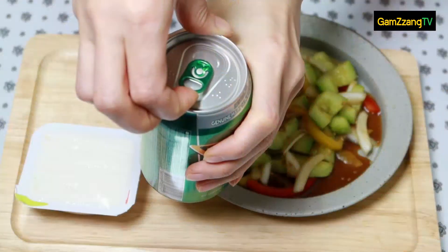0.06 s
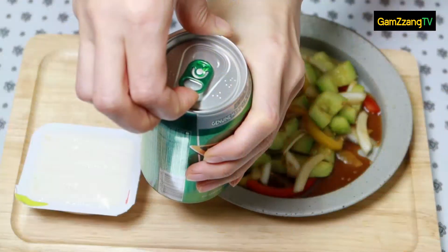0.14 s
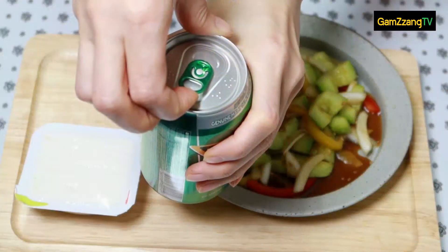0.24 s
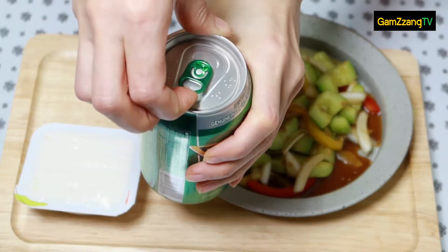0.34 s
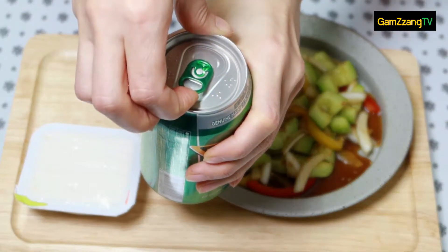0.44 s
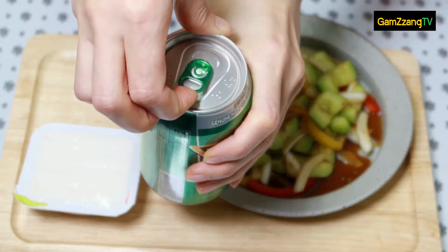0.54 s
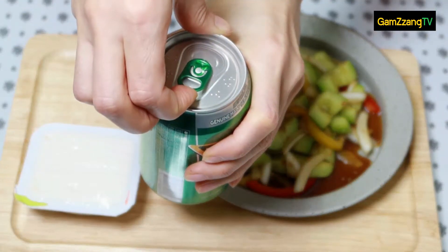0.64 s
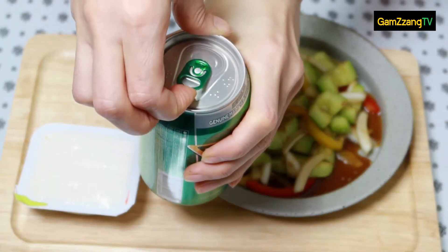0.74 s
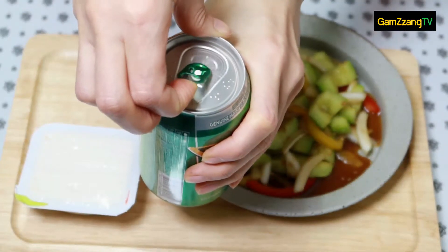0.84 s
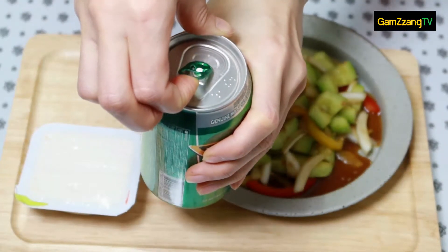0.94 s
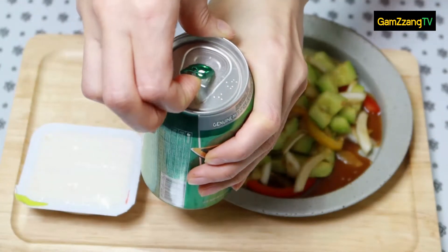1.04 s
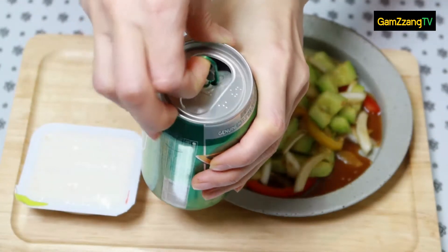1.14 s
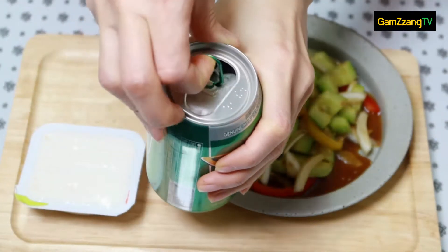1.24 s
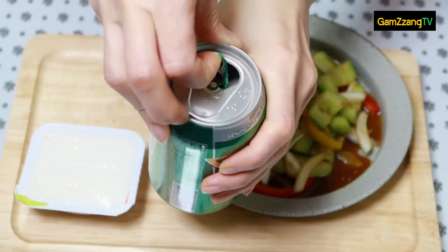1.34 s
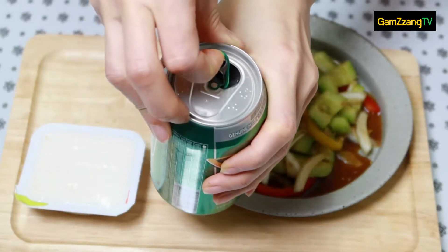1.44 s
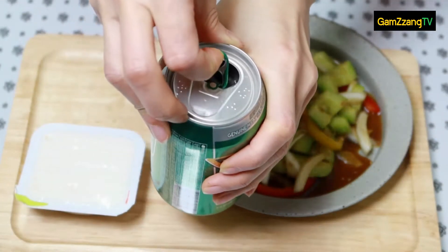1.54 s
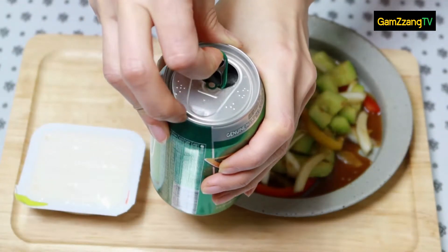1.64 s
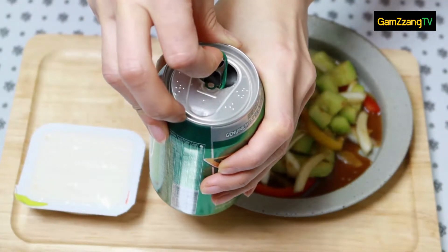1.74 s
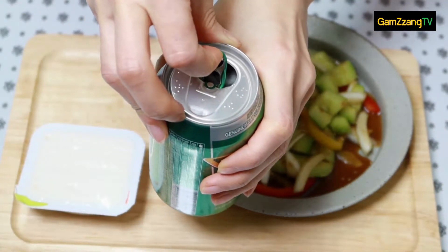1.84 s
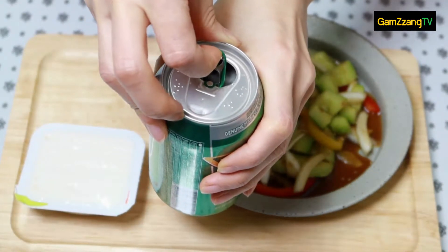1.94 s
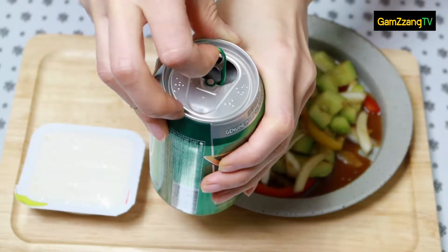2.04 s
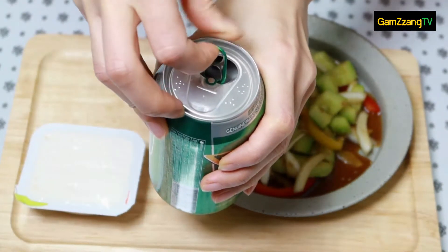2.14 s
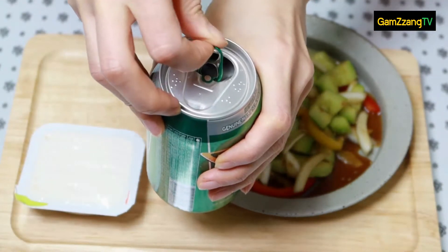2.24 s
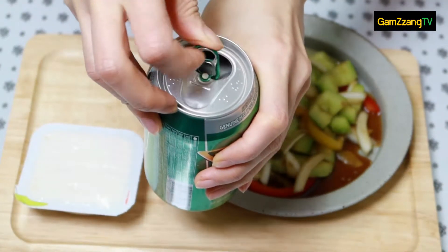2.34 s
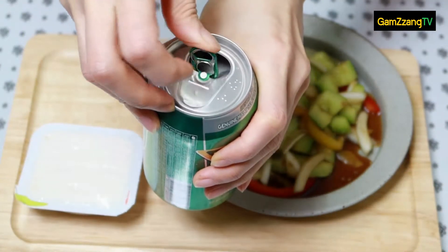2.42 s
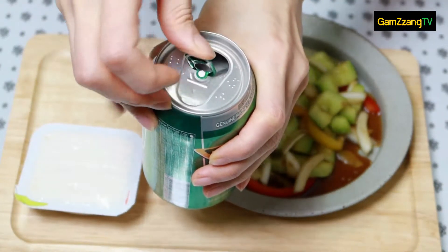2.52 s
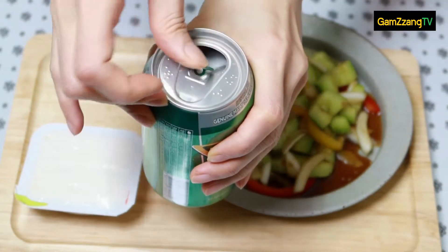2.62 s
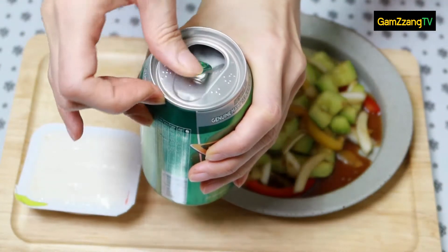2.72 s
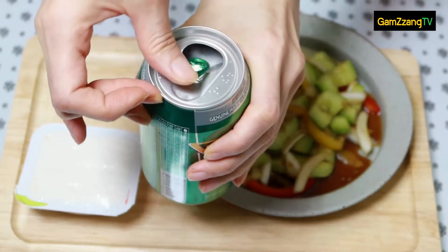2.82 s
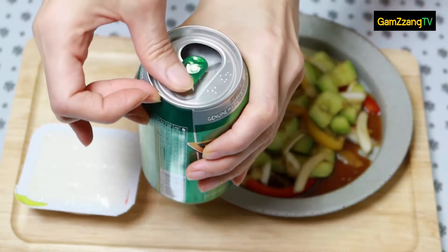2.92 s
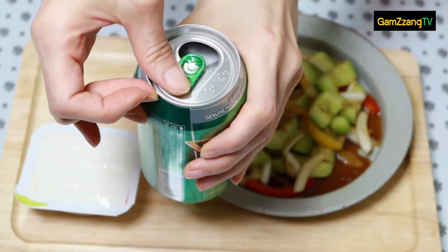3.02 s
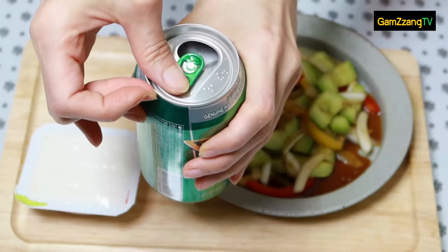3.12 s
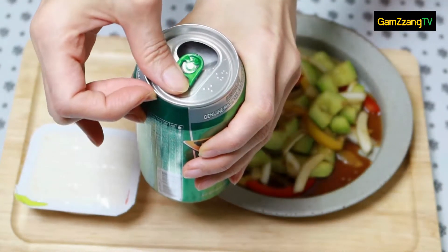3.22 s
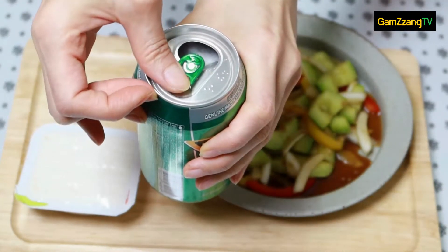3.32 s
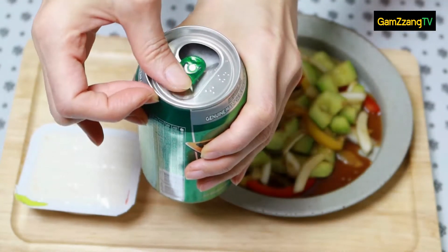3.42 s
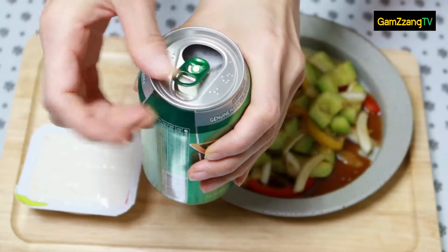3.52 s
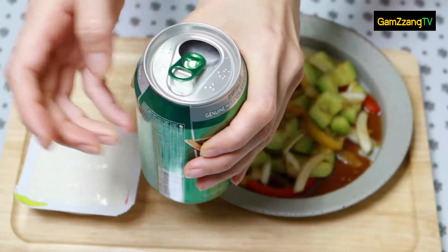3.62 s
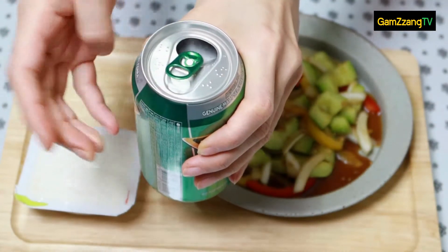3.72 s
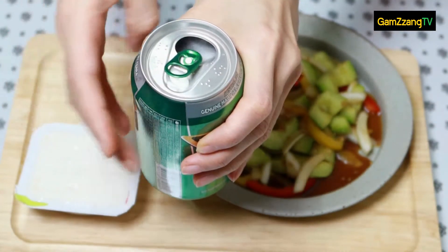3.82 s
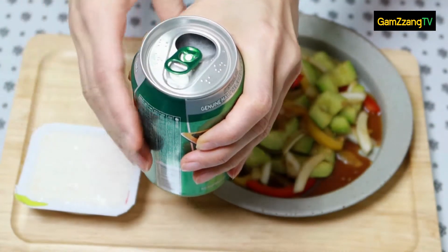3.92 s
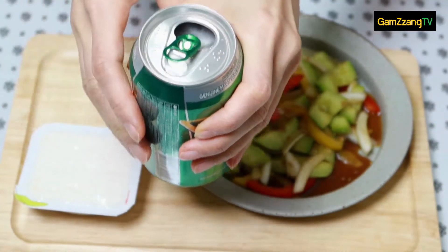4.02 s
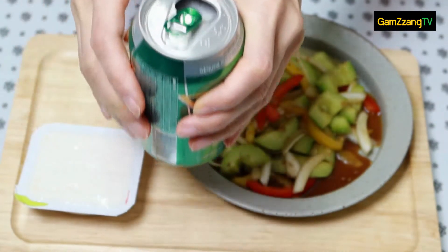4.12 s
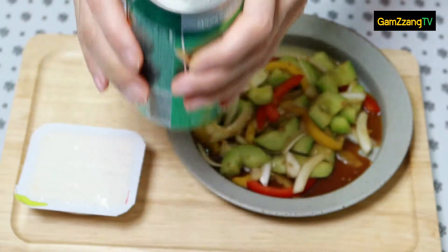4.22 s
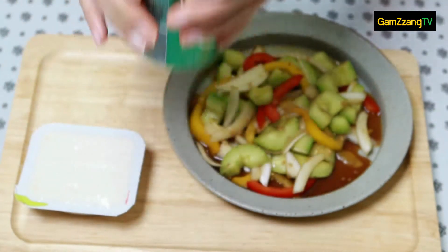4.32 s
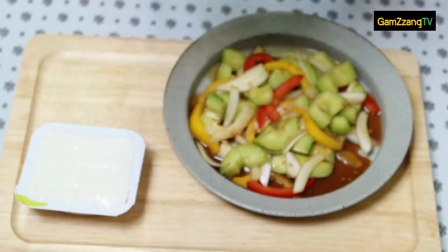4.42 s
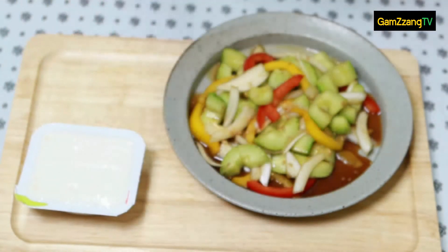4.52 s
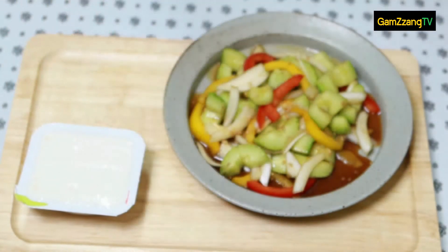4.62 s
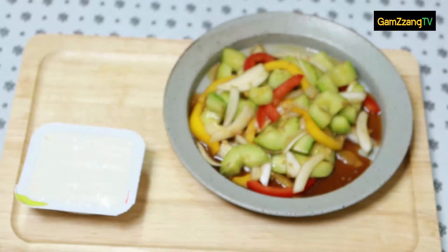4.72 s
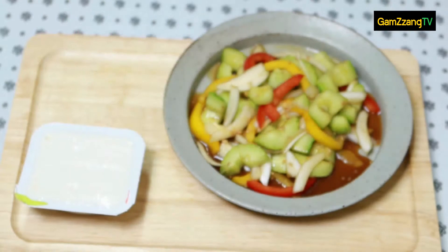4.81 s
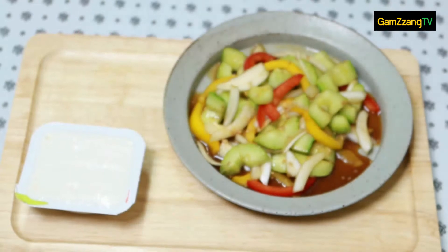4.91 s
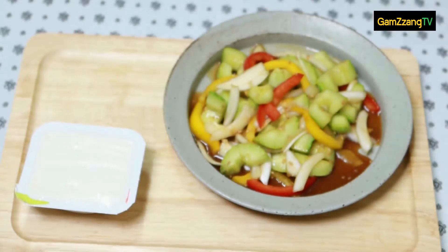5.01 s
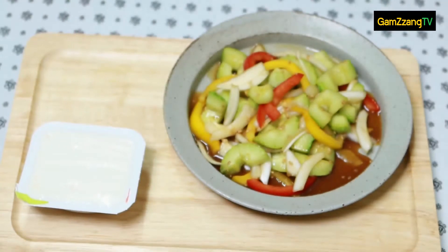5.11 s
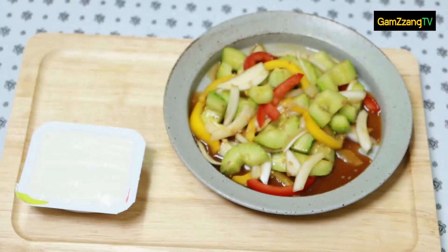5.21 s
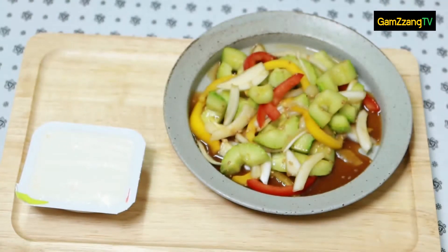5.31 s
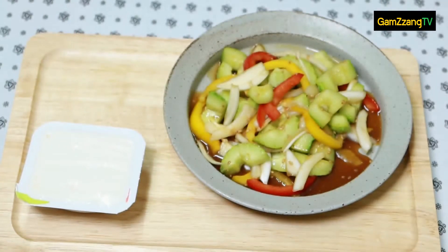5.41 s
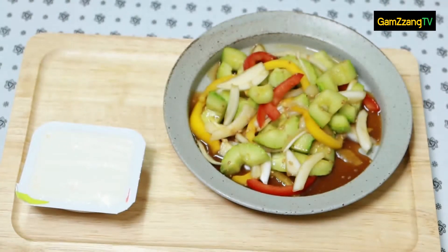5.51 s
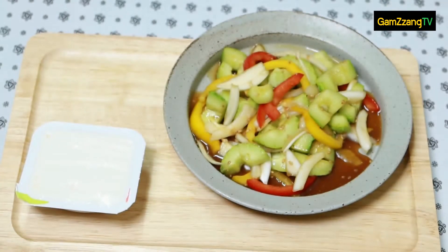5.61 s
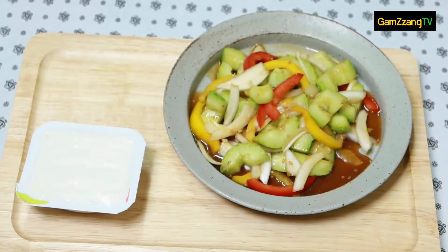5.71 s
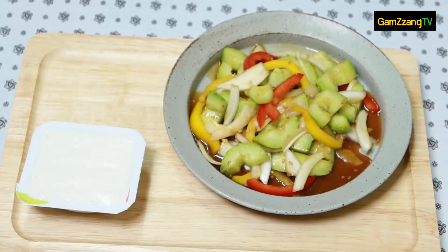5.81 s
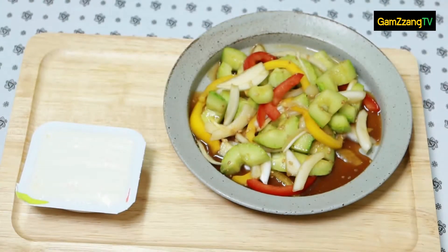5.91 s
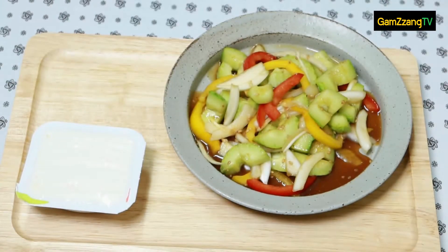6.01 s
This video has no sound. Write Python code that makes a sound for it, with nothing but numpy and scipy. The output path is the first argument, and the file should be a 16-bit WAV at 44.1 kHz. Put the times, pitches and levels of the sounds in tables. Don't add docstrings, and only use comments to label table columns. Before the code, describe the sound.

After a second of low room hum and faint hiss, a drink can vents with a crisp snap and a very short fizzing spurt. The lid then rips open with a dense metallic crackle and a dull pop. Sparse small ticks come from the tab and fingers. Later, softer taps and dry rustling are heard further off. The pickup is close, with a short room echo.

```python
import sys
import numpy as np
from scipy import signal
from scipy.fft import rfft, irfft
from scipy.io import wavfile
from scipy.ndimage import uniform_filter1d

SR = 44100
rng = np.random.default_rng(int(sys.argv[2]) if len(sys.argv) > 2 else 0)


def transcribe(signal):
    frames = np.atleast_2d(signal).T
    limited = np.clip(frames, -1, 1)
    pcm = np.round(limited * 32767).astype(np.int16)
    wavfile.write(sys.argv[1], SR, pcm)


def makeup_ratio(level_db):
    decades = np.asarray(level_db, float) / 20
    return 10 ** decades


N = 267090


def evened(x):
    return x / np.sqrt(np.mean(x ** 2) + 1e-20)


def read(points, hz):
    f, value = np.transpose(points)
    return np.interp(np.log(hz + 1), np.log(f + 1), value)


def coloured(x, points):
    gain = makeup_ratio(read(points, np.fft.rfftfreq(len(x), 1 / SR)))
    return irfft(rfft(x) * gain, len(x))


def envelope(rows, sag_db_per_s=0):
    fade_in_db, fade_out_db = -29.5, -43.5
    t, power = np.arange(N) / SR, np.zeros(N)
    for s, rise, hold, fall, db in rows:
        swell_db = fade_in_db * np.clip(1 - (t - s) / rise, 0, 1) ** 2
        held_db = db + sag_db_per_s * hold
        corners = s + np.cumsum([rise, hold, fall])
        shape_db = np.interp(t, corners, [db, held_db, held_db + fade_out_db], right=-200)
        power += (t > s) * makeup_ratio(swell_db + shape_db) ** 2
    return np.sqrt(power)


def add(mix, s, sound):
    part = mix[round(s * SR):][:len(sound)]
    part += sound[:len(part)]


def ring(t, hz, db, t60):
    return makeup_ratio(db - 60 * t / t60) * np.sin(2 * np.pi * hz * t)


# frequency in Hz, density in dB per Hz.
AIR_COLOUR = [(12, -27), (20, -2.5), (53, -8), (86, 0), (117, -9), (242, -9.5), (271, -17), (330, -10.5),
              (449, -17), (578, -16.5), (2280, -28), (4350, -28.5), (12300, -32), (14500, -26.5),
              (16200, -34)]
# frequency in Hz, width in Hz, level in dB.
MOTOR_LINES = [(81, 13, -59.5), (253.6, 26, -63.5), (329, 49, -67), (1199, 13, -72.5)]


def air(swell_db=3.0):
    swell = evened(uniform_filter1d(rng.standard_normal(N), size=5000, mode="wrap"))
    out = makeup_ratio(-51) * evened(coloured(rng.standard_normal(N), AIR_COLOUR))
    low = signal.lfilter(*signal.butter(2, 600 / SR), out)
    out += low * (makeup_ratio(swell_db * swell) - 1)
    hz = np.fft.rfftfreq(N, 1 / SR)
    for f, width, db in MOTOR_LINES:
        resonance = 1 + (2 * (hz - f) / width) ** 2
        out += makeup_ratio(db) * evened(irfft(rfft(rng.standard_normal(N)) / resonance, N))
    return out


# frequency in Hz, density in dB per Hz.
SIDE_AIR_COLOUR = [(24, -71.5), (40, -44), (220, -45), (288, -12), (395, -7.5), (1150, -8), (3900, -3.5),
                   (12200, -7), (13500, -20)]


def side_air():
    return makeup_ratio(-65.5) * evened(coloured(rng.standard_normal(N), SIDE_AIR_COLOUR))


# frequency in Hz, level in dB, t60 in seconds.
LID_MODES = [(1510, -6.5, 0.0036), (2310, -8.5, 0.0068), (3200, -7, 0.0053), (4270, 0, 0.0022),
             (5400, -8, 0.00079), (5960, 1, 0.00068), (7075, 8, 0.0015), (9020, -1.5, 0.0019),
             (9900, 4.5, 0.00095), (11700, -4, 0.0012), (13646, -4, 0.0005)]


def snap(row, luck, crack_s=0.00027, rattle_s=0.0066, rattle_db=-12.5, spread_db=3.5):
    s, blow_db, tilt_db, hz, db, t60 = row
    t = np.arange(6000) / SR
    brief = t[:900]
    crack = luck[:900] * (np.exp(-brief / crack_s) + makeup_ratio(rattle_db) * np.exp(-brief / rattle_s))
    crack[0] += 3.0

    body = np.zeros(900)
    for k, ((f, mode_db, mode_t60), a, b) in enumerate(zip(LID_MODES, luck[900:], luck[930:])):
        octaves = np.log2(f / 4000)
        octaves += 0.58 * (tilt_db < 0) * max(np.log2(f / 7000), 0)
        struck_db = mode_db + spread_db * b + tilt_db * octaves
        body += (-1) ** k * ring(brief, f * (1 + a / 40), struck_db, mode_t60)
    body = signal.lfilter(*signal.butter(3, 1900 / SR, "high"), body)
    broad = np.convolve(body, crack)
    broad /= abs(broad).max()

    loudest = ring(t, hz, db, t60) + ring(t, hz * 1.03, db - 8, t60)
    near = loudest * np.minimum(t / 0.0017, 1)
    far = near * makeup_ratio(-6.5)
    add(near, 0, broad)
    push_db = -33.5 + 0.6 * blow_db
    add(near, 0, makeup_ratio(push_db) * np.hanning(44))
    add(far, 0, body * np.linalg.norm(broad) / np.linalg.norm(body))
    return s, makeup_ratio(blow_db) * near, makeup_ratio(blow_db) * far


# time in seconds, blow in dB, brightness in dB per octave,
# loudest ring in Hz, its level in dB.
LID_SNAPS = [(0.9779, 4, 4.5, 3330, -2), (1.0457, 2.5, -1, 4385, 9), (1.0462, -8, -8, 1956, 6),
             (1.269, -31, -5.5, 2200, -2.5), (1.2974, -10.5, 4.5, 4470, -4), (1.305, 8.5, 2.5, 4490, 5.5),
             (1.3122, -12.5, -2.5, 2100, 0), (1.3199, -20, 5, 4500, 13.5), (1.3252, -1, -1, 13900, 10),
             (1.3352, 2.5, 1, 12900, -6.5), (1.3430, 10.5, 0.5, 3120, -11.5), (1.3434, -4, 0, 1000, -3),
             (1.4285, -4, 17, 1450, -12), (1.4640, -20, -3, 12200, 6), (1.495, -23, -2, 1930, -28),
             (1.5054, -4, 6, 3200, -11.5), (1.5362, -7, 3.5, 1330, -12.5), (1.541, -5.5, 26, 3380, -12.5),
             (1.555, -24, 9, 3400, -19.5), (1.5725, -4, 4.5, 8700, -3), (1.5765, -5.5, 3.5, 1480, -14)]
# time in seconds, blow in dB, brightness in dB per octave,
# loudest ring in Hz, its level in dB.
TAB_TICKS = [(2.2206, -21.5, -10.5, 3050, -7), (2.2364, -35.5, -12, 2840, -4.5),
             (2.2518, -37, -19, 1500, -8.5), (2.2830, -42, -11, 9060, -12.5), (2.2886, -24.5, 9, 2230, -10),
             (2.515, -40, -5, 2676, -9), (3.2145, -20.5, -2, 1900, -14.5), (3.2147, -26, 0, 7380, 6),
             (3.7043, -19, -5.5, 1025, -8), (3.7056, -25, -2.5, 3010, -8), (3.975, -41.5, -4.5, 393, -6),
             (4.789, -46, -20.5, 1557, -5), (4.829, -40.5, -20, 3330, -11), (4.855, -32.5, 0, 1473, -6.5),
             (4.907, -41.5, -23, 2250, -4), (4.97, -52, 7.5, 1494, 0), (5.056, -47, -4.5, 1570, -2.5),
             (5.92, -27.5, 0.5, 5600, -8.5), (5.926, -34, -1, 4040, -2)]
# time in seconds, blow in dB, ring in Hz.
FINGER_SQUEAKS = [
    (5.390, -48, 11700),
    (5.428, -52, 7760),
    (5.440, -49, 11800),
]


def blows():
    snaps, ticks = [], []
    for row in LID_SNAPS:
        hz, db = row[3:]
        t60 = 0.011 * (3000 / hz) ** 0.2
        snaps.append((*row, t60 * makeup_ratio(-0.18 * np.clip(db, -20, 5))))
    for row in TAB_TICKS:
        t60 = 0.012 * (3000 / row[3]) ** 2.2 + 0.008
        ticks.append((*row, min(t60, 0.068)))
    squeaks = [(s, db, 1.3, hz, 3.5, 0.043) for s, db, hz in FINGER_SQUEAKS]
    return snaps + ticks + squeaks


# time in seconds, level in dB.
AIR_PUSHES = [
    (1.0466, -20),
    (1.3440, -9),
]


def lid():
    near, far = np.zeros((2, N))
    for row, luck in zip(blows(), rng.standard_normal((60, 960))):
        s, to_near, to_far = snap(row, luck)
        add(near, s, to_near)
        add(far, s, to_far)
    for s, db in AIR_PUSHES:
        add(near, s, makeup_ratio(db) * np.hanning(60))
    return near, far


# frequency in Hz, density in dB per Hz.
GAS_COLOUR = [(290, -65), (500, -43.5), (1050, -43.5), (2430, -22), (2730, -30), (4340, -17.5),
              (4730, -18.5), (6800, -14), (11300, -7), (16000, -13.5)]
# start, rise, hold and fall in seconds, level in dB.
GAS_BURSTS = [
    (.978, .001, 0.0012, 0.01, -12),
    (.978, .03, 0.033, .022, -3),
    (2.255, 0.042, .002, 0.042, -43),
]


def jet(flutter_db=0.5):
    flutter = evened(uniform_filter1d(rng.standard_normal(N), size=60))
    gas = evened(coloured(rng.standard_normal(N), GAS_COLOUR))
    return gas * envelope(GAS_BURSTS, sag_db_per_s=-100) * makeup_ratio(flutter_db * flutter)


# frequency in Hz, t60 in seconds.
KITCHEN_T60 = [(500, 0.039), (1500, 0.41), (4000, 0.25), (8000, 0.23), (15000, 0.16)]


def kitchen(x, first_s=0.003):
    taps = np.zeros(SR // 2)
    at = np.arange(round(first_s * SR), len(taps) - 20, 20)
    taps[at + rng.integers(0, 20, len(at))] = rng.choice([-1., 1.], len(at))
    hz, t, z = signal.stft(taps, SR, nperseg=128)
    decay = makeup_ratio(-60 * t / read(KITCHEN_T60, hz)[:, None])
    tail = signal.istft(z * decay, SR, nperseg=128)[1]
    return signal.fftconvolve(x, tail / np.linalg.norm(tail))[:N]


# frequency in Hz, gain in dB.
SEALED_COLOUR = [(700, -8), (1400, -1.5), (2050, 3), (3100, -12), (3700, 5), (4500, 3), (5600, -0.5),
                 (12000, -4)]
# frequency in Hz, gain in # dB
SIDE_COLOUR = [(60, -9), (300, -15), (900, -15), (1800, -14.5), (3300, -16), (4500, -37.5), (16000, -30)]


def reflections(far):
    sealed = np.arange(N) < 1.26 * SR
    sent = coloured(far * sealed, SEALED_COLOUR) + far * ~sealed
    return makeup_ratio(-9.5) * kitchen(sent), coloured(kitchen(sent), SIDE_COLOUR)


# frequency in Hz, level in dB, t60 in seconds.
WALL_MODES = [(1000, -19, .02), (1460, -15, .03), (2200, -18.5, 0.027), (3140, -17.5, .03)]
# start, rise, hold and fall in seconds, level in dB.
LID_RIPS = [
    (1.294, .008, .045, .2, -27.5),
    (1.34, .02, 0.11, .06, -33),
    (1.49, .015, 0.046, 0.039, -42.5),
]


def tear(per_s=5400.0, size_db=0.5, tilt_db=4.24):
    happens = rng.random(N) < per_s / SR
    slips = happens * rng.standard_normal(N) * makeup_ratio(size_db * rng.exponential(1, N))
    t = np.arange(2000) / SR
    response = np.zeros(2000)
    for f, db, t60 in LID_MODES + WALL_MODES:
        response += ring(t, f, db + tilt_db * np.log2(f / 4000), 1.8 * t60)
    torn = evened(signal.oaconvolve(slips, response)[:N])
    return torn * envelope(LID_RIPS, sag_db_per_s=-30.5)


# frequency in Hz, density in dB per Hz.
CLOTH_COLOUR = [(800, -8.5), (2500, -10.5), (5000, -8), (8500, -8.5), (12500, -11.5), (16000, -6.5)]
# start, rise, hold and fall in seconds, level in dB.
CLOTH_MOVES = [
    (4.75, .1, 1.2, .1, -65),
    (4.77, .08, .03, .25, -57),
    (5.12, .17, .02, .35, -57),
    (5.31, .12, .07, .17, -53),
    (5.917, .004, .01, .2, -54),
]


def rustle():
    return evened(coloured(rng.standard_normal(N), CLOTH_COLOUR)) * envelope(CLOTH_MOVES)


def scene():
    near, far = lid()
    gas = jet() + tear()
    room_mid, room_side = reflections(far + gas)
    mid = near + gas + room_mid + rustle() + air()
    side = room_side + side_air()
    return np.array([mid + side, mid - side])


def roll_off(x):
    return signal.sosfilt(signal.butter(12, 16390, fs=SR, output="sos"), x)


def record(dry):
    power = abs(uniform_filter1d((dry ** 2).mean(0), size=600))
    over_db = np.maximum(10 * np.log10(power + 1e-12) + 24.0, 0)
    duck_db = np.zeros(N)
    for share, recovery_db_per_s in ((0.18, 2.0), (0.04, 36.0)):
        fall = np.arange(N) * recovery_db_per_s / SR
        duck_db += np.maximum.accumulate(share * over_db + fall) - fall
    ducked = dry / makeup_ratio(uniform_filter1d(duck_db, size=400, origin=199))
    return roll_off(ducked)


dry = scene()
out = record(dry)
transcribe(out)
```